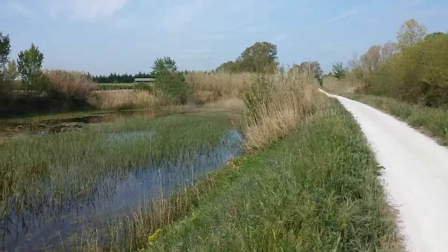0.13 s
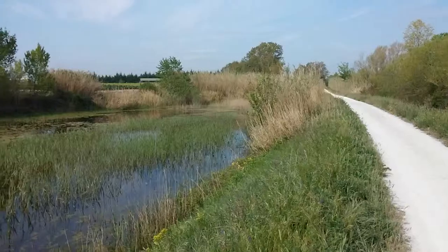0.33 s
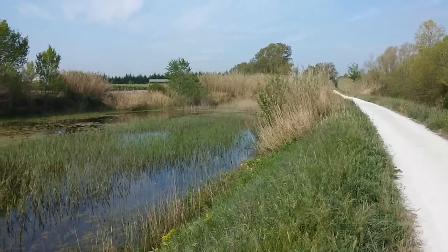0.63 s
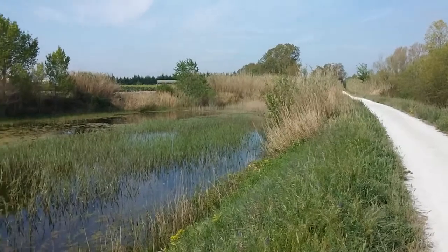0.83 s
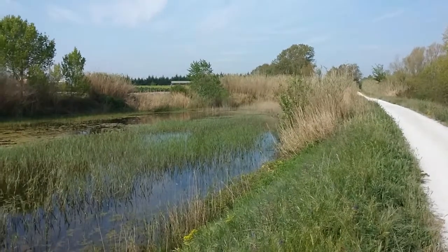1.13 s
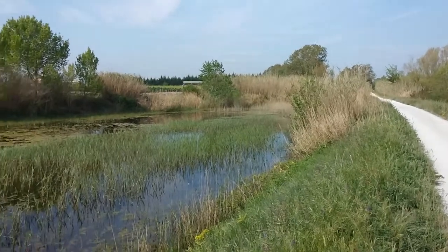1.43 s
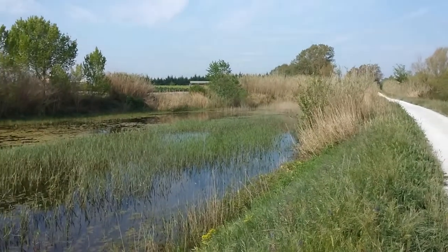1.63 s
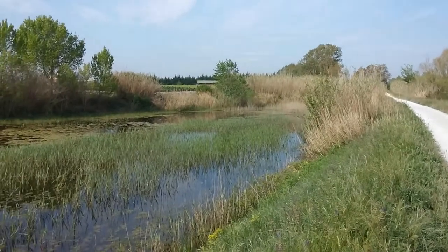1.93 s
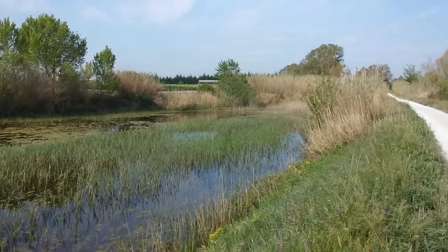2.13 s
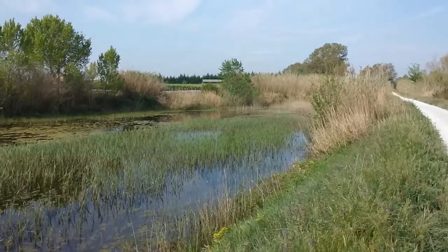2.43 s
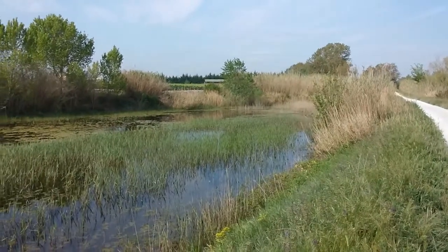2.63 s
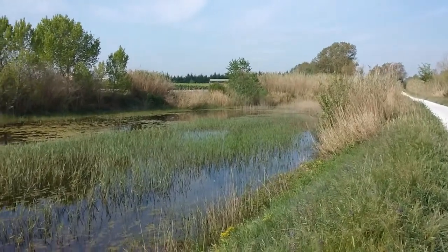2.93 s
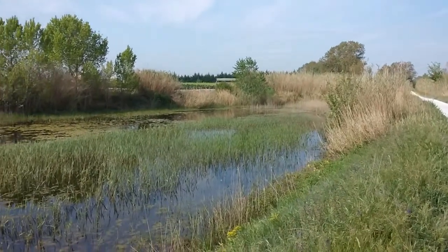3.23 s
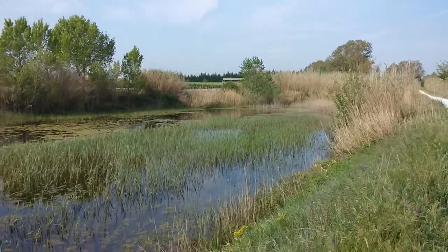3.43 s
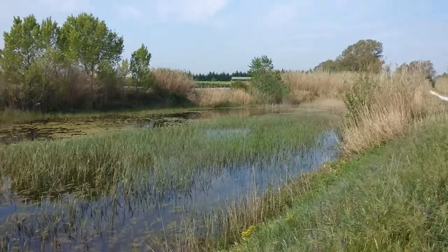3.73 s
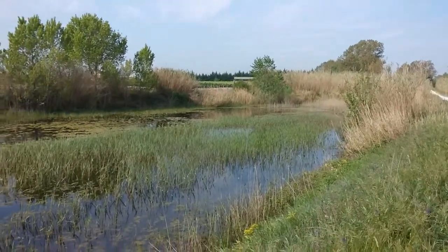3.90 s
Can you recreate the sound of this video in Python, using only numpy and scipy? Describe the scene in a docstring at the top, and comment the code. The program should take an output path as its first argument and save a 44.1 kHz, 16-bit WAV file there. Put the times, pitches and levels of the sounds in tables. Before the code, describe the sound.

Several frogs call in dry, pulsing rattles at a pond, the nearest to the right, with short rough croaks between. Gusts thud unevenly into the open microphone, strongest in the first two and a half seconds, then drop away. Faint reed rustle and airy hiss lie behind; small birds whistle and chirp on the left, clearest late.

```python
"""Gusts, reeds and overlapping frogs open a reedy pond scene: a near frog rattles and a bank frog pulses.
From about 1 s a small bird whistles sliding notes on the left, and the first run of croaks passes.
The near frog rattles again from 1.5 s; more croaks, hoots and whistles follow as the wind eases to the end.
Frogs are pulses ringing decaying sines; hoots and birds are gliding sines; wind and reeds are flickering
noise bands, with short low-pitched blows added to the wind at each microphone port."""
import sys
import numpy as np
from scipy import signal
from scipy.io import wavfile

SR = 44100
rng = np.random.default_rng(int(sys.argv[2]) if len(sys.argv) > 2 else 0)


def put_to_file(sound):
    """Save the sound as 16-bit audio at rate SR, in the file named by the first command-line argument."""
    columns = np.atleast_2d(sound).T  # one column per channel
    safe = np.clip(columns, -1, 1)
    whole_steps = np.round(safe * 32767)
    wavfile.write(sys.argv[1], SR, whole_steps.astype(np.int16))


N = 179222
TIME = np.arange(N) / SR
# The left port is ahead for the near, croaking and chattering frogs, behind for birds, bank frog and tick.
FROG_LEAD_S, LEFT_LAG_S = 0.000736, 0.00017


def from_db(db):
    """Decibels to amplitude."""
    return 10 ** (np.asarray(db) / 20)


def rms_one(x):
    """Scale each channel to an rms of 1."""
    return x / np.sqrt(np.mean(x ** 2, axis=-1, keepdims=True) + 1e-20)


def in_time(rows):
    """Columns joined in time, and a mask of the span."""
    s, *columns = np.transpose(rows)
    return [np.interp(TIME, s, c) for c in columns] + [(TIME > s[0]) & (TIME < s[-1])]


def drift(rate_hz):
    """Slow random curve of spread 1 per channel: white noise through a two-pole low-pass."""
    step = 20  # samples between points of the curve
    pole = np.exp(-2 * np.pi * step * rate_hz / SR)
    white = rng.standard_normal((2, N // step + 2002))
    smooth = signal.lfilter([1], [1, -2 * pole, pole * pole], white)
    slow = rms_one(smooth[:, 2000:])  # drop the filter's settling
    return np.array([np.interp(np.arange(N) / step, np.arange(len(v)), v) for v in slow])


def place(x, pan_db, lag_s):
    """Left-right level split; the left port hears the sound lag_s later."""
    ports = np.array([np.interp(TIME - lag_s, TIME, x), x])
    return ports * from_db([[pan_db / 2], [-pan_db / 2]])


def pond_echo(x, echo_db=-20):
    """A few dull echoes off water and bank."""
    dull = signal.lfilter([.3], [1, -.7], x)
    echoes = sum(np.interp(TIME - lag_s, TIME, dull) for lag_s in (.009, .017, .026))
    return x + from_db(echo_db) * echoes


def pings(s, db, hz, t60_s, rise_s=0.00071):
    """Each pulse is a sine that swells fast and dies away."""
    t = np.arange(900) / SR
    shape = (1 - np.exp(-(t / rise_s) ** 2)) * from_db(-60 * t / t60_s)
    sines = np.sin(2 * np.pi * np.outer(hz, t))
    waves = from_db(db)[:, None] * shape / shape.max() * sines
    first = np.clip(np.round(s * SR).astype(int), 0, N - 1)
    out = np.zeros(N + 900)
    np.add.at(out, first[:, None] + np.arange(900), waves)
    return out[:N]


def glides(notes, flutter_hz):
    """Sliding tones whose strength and phase flutter."""
    out, flutter = np.zeros(N), drift(flutter_hz)
    for s, length, start_hz, end_hz, db in notes:
        at = slice(int(s * SR), int((s + length) * SR))
        part = (TIME[at] - s) / length
        phase = 2 * np.pi * np.cumsum(start_hz + (end_hz - start_hz) * part) / SR
        voice = (1 + .5 * flutter[0, at]) * np.sin(phase) + .5 * flutter[1, at] * np.cos(phase)
        swell = np.sqrt(np.abs(np.sin(np.pi * part)))
        out[at] += from_db(db) * swell * voice
    return out


def banded_noise(spectrum, patchy_db, rate_hz):
    """Half-octave bands of noise, unrelated in both channels, flickering both together and singly."""
    hz, level_db = np.transpose(spectrum)
    out, together = 0, drift(rate_hz)
    edges = hz[0] * 2 ** np.arange(0, np.log2(hz[-1] / hz[0]) + .01, .5)
    white = rng.standard_normal((2, 2, N))  # neighbouring bands use different noise
    for k, (low, high) in enumerate(zip(edges, np.append(edges[1:], hz[-1] + 1))):
        band_filter = signal.butter(2, [low, high], "band", fs=SR, output="sos")
        band = signal.sosfilt(band_filter, white[k % 2])
        centre_db = np.interp(np.log(low * high) / 2, np.log(hz), level_db)
        flicker = from_db(patchy_db * (together + 0.98 * drift(rate_hz)))
        out = out + from_db(centre_db) * band * flicker
    return out


# Reeds and air over time: t/s, left rush level/dB, right rush level/dB, rustle level/dB
AIR_LEVELS = [(.16, -42, -51, -56), (.35, -46.5, -61, -54), (.9, -45, -51, -56), (1.5, -47, -47.5, -57),
              (1.66, -54.5, -56.5, -68.5), (1.96, -52.5, -71, -69), (2.2, -48.5, -53, -65.5),
              (2.41, -55.5, -58, -68.5), (2.6, -50.5, -55, -62.5), (2.86, -57, -60, -66),
              (3.05, -59, -57, -67), (3.31, -57, -57.5, -73.5), (3.61, -43.5, -51, -61),
              (3.9, -50, -54.5, -64), (4.06, -45, -50, -55.5)]
# Hiss over time: t/s, left level/dB
HISS_LEVELS = [(.16, -59.5), (.31, -74), (.5, -66.5), (1.1, -62), (3.3, -61), (4.06, -65.5)]
# Tone of the rush, the reed rustle and the hiss: f/Hz, relative level/dB per Hz
RUSH_SPECTRUM = [(150, -21), (250, -4), (949, 4), (1230, -14), (1570, 2), (1930, -1.5), (2800, -9.5),
                 (3640, -38), (6160, -120)]
RUSTLE_SPECTRUM = [(2200, -16), (3000, 1.5), (4500, 7.5), (5500, -2.5), (7000, 1), (9000, -32.5)]
HISS_SPECTRUM = [(2650, -34), (4500, -35), (5070, 1), (5840, -6.5), (7260, -8.5), (11800, -13), (14900, -8),
                 (15600, -28)]
RUSTLE_PAN_DB, HISS_PAN_DB = 5.5, 5  # left over right
RUMBLE_DB = -50.5


def air():
    """Mid rush of air, rustle of reeds, a high hiss and a faint distant rumble, all from banded noise."""
    left_db, right_db, rustle_db, _ = in_time(AIR_LEVELS)
    hiss_db, _ = in_time(HISS_LEVELS)
    rush = rms_one(banded_noise(RUSH_SPECTRUM, patchy_db=2.5, rate_hz=11.1))
    rush = rush * from_db([left_db, right_db])
    rustle = rms_one(banded_noise(RUSTLE_SPECTRUM, patchy_db=-0.1, rate_hz=28))
    rustle = rustle * from_db([rustle_db + RUSTLE_PAN_DB / 2, rustle_db - RUSTLE_PAN_DB / 2])
    hiss = rms_one(banded_noise(HISS_SPECTRUM, patchy_db=1.5, rate_hz=7.8))
    hiss = hiss * from_db([hiss_db, hiss_db - HISS_PAN_DB])
    rumble_spectrum = [(40, 10.5), (70, 2), (160, -17.5)]  # f/Hz, relative level/dB per Hz
    rumble = rms_one(banded_noise(rumble_spectrum, patchy_db=1.0, rate_hz=3.7)) * from_db(RUMBLE_DB)
    return rush + rustle + hiss + rumble


# Buffeting at each port, before the filters that shape it: t/s, left level/dB, right level/dB
WIND_LEVELS = [(.16, -33, -11), (.36, -25, -16), (.56, -23, -12.5), (.8, -22, -17.5), (1.0, -49, -19.5),
               (1.2, -15, -26.5), (1.36, -32, -44.5), (1.5, -24.5, -38), (1.68, -19.5, -42),
               (1.86, -34.5, -21.5), (2.0, -28.5, -18), (2.33, -31.5, -27), (2.54, -20.5, -24),
               (2.72, -37.5, -51), (2.88, -36.5, -35.5), (3.0, -45.5, -53), (3.12, -28, -49),
               (3.25, -37.5, -62), (3.3, -32.5, -45), (3.62, -46.5, -78), (4.06, -52, -72)]
# Tone of the buffeting: f/Hz, relative level/dB per Hz
BUFFET_SPECTRUM = [(15, -66), (25, -40), (59, 11), (109, 5.5), (248, -3.5), (706, -61), (1500, -48.5),
                   (1950, -63), (3300, -120)]
# Single blows of wind, before the bass cut: t/s, body level/dB, f/Hz, port (1 right, anything below left)
WIND_BLOWS = [(0.162, -14.5, 103, 1), (0.176, -16, 105, 0), (0.259, -21, 93, 0), (0.345, -6.5, 126, 0),
              (0.358, -10.0, 92, 0), (0.377, -7.5, 146, 1), (0.547, -11.5, 124, 0), (0.569, -5.5, 248, 1),
              (0.616, -8, 93, 0), (0.621, -6, 162, 1), (0.649, -8, 144, 1), (0.72, -16, 108, 1),
              (0.812, -10, 179, 1), (0.845, -8.5, 145, 1), (0.849, -4, 126, 0), (0.872, -14.5, 145, 0),
              (0.934, -10.5, 115, 1), (1.117, -17, 158, 1), (1.225, -4, 172, 0), (1.402, -17.5, 109, 0),
              (1.447, -6.5, 99, 0), (1.5, -10, 147, 0), (1.523, -13, 87, 0), (1.635, -9, 83.5, 0),
              (1.691, -3, 97, 0), (1.698, -16, 116, 1), (1.802, -16, 129, 1), (1.799, -20, 261, 1),
              (1.824, -5, 114, 0), (1.845, -12.5, 250, 0.91), (1.858, -3, 98, 0), (1.934, -20, 96, 0),
              (1.959, -12, 178, 1), (1.972, -15, 119, 0), (2.019, -17, 120, 0), (2.089, -0.5, 128.5, 0),
              (2.138, -22, 278, 1), (2.22, -11, 158, 1), (2.233, -5.5, 118, 0), (2.36, -20.5, 124, 1),
              (2.38, -15, 87, 0), (2.48, -13.5, 131, 1), (2.496, -5.5, 139, 0), (2.551, -17, 232, 0.97),
              (2.689, -20.5, 280, 0.96), (2.69, -8.5, 93, 0), (2.873, -19.5, 79.4, 0),
              (2.899, -21.5, 147, 1), (3.068, -30, 130, 1), (3.069, -27.5, 131, 0), (3.109, -23, 67.5, 0),
              (3.176, -14.5, 136, 0), (3.313, -27, 98, 0), (3.345, -37, 100, 0), (3.384, -27, 210, 0)]


def wind():
    """Lumpy low noise in each port, with single blows of a cycle or two and a sharper edge on top."""
    left_db, right_db, _ = in_time(WIND_LEVELS)
    out = rms_one(banded_noise(BUFFET_SPECTRUM, patchy_db=4.5, rate_hz=13.94))
    out = out * from_db([left_db, right_db])
    # finer eddies at the right port, slower ones at the left
    out[1] += 0.52 * signal.sosfilt(signal.butter(2, 220, "high", fs=SR, output="sos"), out[1])
    out[0] += 0.73 * signal.sosfilt(signal.butter(2, 90, fs=SR, output="sos"), out[0])
    out[1] = signal.sosfilt(signal.butter(2, 70, "high", fs=SR, output="sos"), out[1])
    for s, db, hz, port in WIND_BLOWS:
        first = max(int((s - .05) * SR), 0)
        cycles = (TIME[first:int((s + .05) * SR)] - s) * hz
        body = np.exp(-(cycles / 0.65) ** 2) * np.cos(2 * np.pi * (cycles + rng.random()))
        edge = np.exp(-(cycles / 0.32) ** 2) * np.cos(2 * np.pi * (1.93 * cycles + rng.random()))
        out[int(port), first:first + len(cycles)] += from_db(db) * (body + 0.27 * edge)
    # the capsules drop deep bass
    return signal.sosfilt(signal.butter(4, 54, "high", fs=SR, output="sos"), out)


def tick():
    """One very short bright snap on the left: a 9.5 kHz sine that dies almost at once."""
    snap = pings(np.array([1.497]), np.array([-41]), [9500], t60_s=.0012, rise_s=.00004)
    return place(snap, 14, LEFT_LAG_S)


WARBLE_DB = 2.4  # unsteadiness of the whistled notes
UPPER_SWING = 0.16  # share of the swell and fade that reaches the upper partials


def whistle(notes, multiples, rise_db, fall_db):
    """Near sines that slide from start to end pitch, swell to a peak and fade, a little unsteady."""
    out = np.zeros(N)
    for s, length, peak, start_hz, end_hz, bend, *levels_db in notes:
        at = slice(int(s * SR), int((s + length) * SR))
        t = TIME[at] - s
        slide = np.expm1(-bend * t / length) / np.expm1(-bend + 1e-9)
        turns = np.cumsum(start_hz + (end_hz - start_hz) * slide) / SR
        swing_db = np.interp(t, [0, peak, length], [-rise_db, 0, -fall_db])
        for k, db in zip(multiples, levels_db):
            share = 1 if k == 1 else UPPER_SWING
            out[at] += from_db(db + swing_db * share) * np.sin(2 * np.pi * k * turns)
    return pond_echo(out * from_db(WARBLE_DB * drift(90)[0]), echo_db=-13.5)


# Song in three partials: t/s, length/s, peak after/s, start f/Hz, end f/Hz, bend (+ slides early, - late),
# level/dB, level/dB at 1.5 times the pitch, level/dB at twice the pitch
SONG_NOTES = [(1.085, 0.052, 0.015, 3100, 2960, 1.8, -56, -60, -77),
              (1.255, 0.089, .025, 3300, 2890, 0.95, -55, -60.5, -77),
              (1.435, 0.072, 0.025, 3471, 3050, 1.6, -48.5, -56, -60),
              (1.62, 0.072, .022, 3500, 3090, 1.4, -51.5, -65, -82),
              (1.79, 0.078, 0.037, 3750, 3070, 1.5, -50, -77, -77),
              (1.978, .075, 0.031, 3690, 3120, 1.55, -46.5, -80, -70),
              (2.16, 0.088, 0.036, 3740, 3185, 2, -46.5, -72, -80),
              (2.34, 0.084, 0.043, 3740, 3284, 3.15, -44, -60, -71),
              (2.53, .075, .034, 3780, 3240, 2.1, -45, -64, -72),
              (2.72, 0.076, 0.023, 3820, 3240, 2.3, -46.5, -59, -70),
              (2.905, 0.087, 0.033, 3880, 3220, 2.2, -48, -59.5, -63.5)]
# Other birds' whistles: t/s, length/s, peak after/s, start f/Hz, end f/Hz, bend (as above), level/dB
WHISTLE_NOTES = [(2.15, 0.045, 0.039, 3150, 3010, 0.5, -48), (3.01, 0.023, .006, 2900, 3000, -.9, -54),
                 (3.035, 0.065, .012, 3240, 3370, 1.5, -51.5), (3.415, 0.019, 0.024, 4140, 4720, 2, -41),
                 (3.435, 0.019, 0.0044, 3910, 3270, 1.5, -45), (3.505, 0.064, 0.012, 3480, 2980, -3, -47.5),
                 (3.515, 0.08, 0.05, 2370, 2580, 1.5, -44.5), (3.68, 0.053, 0.033, 3680, 3070, -3.5, -43.5),
                 (3.732, 0.064, 0.034, 4000, 3940, 0, -41), (3.815, 0.069, .03, 3100, 3490, 2.2, -47.5),
                 (3.88, 0.043, 0.027, 3710, 2980, -3, -39.5)]
# Hoarse chirps: t/s, length/s, start f/Hz, end f/Hz, level/dB
CHIRP_NOTES = [(0.792, 0.052, 5840, 6170, -57.5), (.89, .12, 4640, 4720, -61),
               (1.116, 0.067, 4770, 4180, -57), (1.24, 0.062, 5300, 6160, -62),
               (1.298, .03, 6000, 6100, -57), (1.303, 0.048, 5300, 5580, -54),
               (1.338, 0.045, 5400, 4670, -58), (1.447, 0.019, 7900, 7900, -61.5),
               (1.62, 0.016, 4800, 4400, -61), (1.63, 0.034, 5870, 5700, -61.5),
               (1.99, 0.0097, 7000, 7100, -57.5), (2.059, 0.044, 4820, 4400, -64),
               (2.1, 0.032, 4870, 4890, -57), (2.59, 0.072, 5550, 4840, -52),
               (3.006, 0.011, 5700, 5600, -59), (3.027, 0.018, 5690, 5640, -54.5),
               (3.042, 0.014, 5880, 5400, -49), (3.063, 0.012, 5420, 4750, -48),
               (3.24, 0.074, 4440, 5760, -66), (3.665, 0.043, 5580, 5400, -60),
               (3.705, 0.036, 5400, 4170, -56)]


def birds():
    """Sliding whistles and hoarse fluttering chirps, all to the left."""
    song = whistle(SONG_NOTES, multiples=(1, 3 / 2, 2), rise_db=21, fall_db=20)
    others = whistle(WHISTLE_NOTES, multiples=(1,), rise_db=17.5, fall_db=20.5)
    chirps = pond_echo(glides(CHIRP_NOTES, flutter_hz=170), echo_db=-10)
    return place(song, 17, LEFT_LAG_S) + place(others, 9.0, LEFT_LAG_S) + place(chirps, 18, LEFT_LAG_S)


# Frog on the left bank, one row a group: t/s of the middle pulse, level/dB
BANK_GROUPS = [(0.187, -40.5), (0.23, -40.5), (0.267, -39.5), (0.311, -39), (0.351, -40.5), (0.385, -44.5),
               (0.427, -39), (0.473, -40.5), (0.515, -41.5), (0.557, -42), (0.597, -42.5), (0.635, -42),
               (0.679, -37.5), (0.721, -41), (0.761, -40), (0.802, -38.5), (0.85, -41), (0.899, -41.5),
               (0.935, -41.5), (0.981, -48), (1.012, -56), (1.048, -53)]
# Its resonances: f/Hz, 60 dB decay/s, relative level/dB, left over right/dB
BANK_RESONANCES = [(2760, 0.012, -2, -1.5), (3380, 0.0017, -2.5, 24), (4190, 0.013, -8, 15.5)]


def bank_frog(gap_s=.0078):
    """Three uneven pulses a group, the middle one strongest on average, ring three resonances."""
    s, db = np.transpose(BANK_GROUPS)
    chance = rng.normal(0, 1, (len(s), 3, 3))
    times = (s[:, None] + gap_s * np.arange(-1, 2) + 0.001 * chance[..., 0]).ravel()
    levels = (db[:, None] + np.array([-3.0, 0, -2.5]) + 2.0 * chance[..., 1]).ravel()
    detune = 1 + .01 * chance[..., 2].ravel()
    out = 0
    for hz, t60_s, mode_db, pan_db in BANK_RESONANCES:
        ring = pings(times, levels + mode_db, hz * detune, t60_s, rise_s=0.0004)
        out = out + place(ring, pan_db, LEFT_LAG_S)
    return out


# Several frogs overlapping, one list a run: t/s, level/dB, sac f/Hz
CHATTER_RUNS = [
    [(.158, -41, 2070), (.19, -44.5, 2130), (.24, -46, 2140), (.27, -55, 2050), (.48, -60, 1900),
     (.64, -52, 1780)],
    [(0.86, -55, 2030), (0.924, -47, 2280), (1.0, -44, 2090)],
    [(2.12, -43.5, 1930), (2.268, -40, 1814), (2.476, -42, 1950), (2.57, -44.5, 1910)],
    [(2.65, -39.5, 1970), (2.802, -46, 1900), (2.858, -48, 1990), (2.996, -44, 1935), (3.088, -67, 1920),
     (3.2, -62, 1740)],
]


def chatter(per_s=190, spread_db=2.0):
    """Pulses of several frogs fall at uneven gaps, each with its own strength and sac pitch."""
    out = 0
    for rows in CHATTER_RUNS:
        db, hz, _ = in_time(rows)
        chance = rng.normal(0, 1, (300, 3))
        times = rows[0][0] + np.cumsum(np.exp(.22 * chance[:, 0])) / per_s
        at = (times[times < rows[-1][0]] * SR).astype(int)
        chance = chance[:len(at)]
        levels = db[at] + spread_db * chance[:, 1]
        pitches = hz[at] + 110 * chance[:, 2]
        out = out + pings(at / SR, levels, pitches, t60_s=.013, rise_s=0.0014)
    return place(pond_echo(out), -12.0, -FROG_LEAD_S)


# Croaks, one list a run: t/s, level/dB, sac f/Hz, pulse rate f/Hz
CROAK_RUNS = [
    [(1.01, -50, 2000, 185), (1.055, -42.5, 1830, 195), (1.09, -48, 1760, 205), (1.108, -51, 1800, 215),
     (1.135, -41.5, 1770, 224), (1.168, -36, 1760, 370), (1.2, -48, 1800, 116)],
    [(2.545, -56, 1420, 230), (2.585, -38, 1690, 290), (2.627, -30.5, 1830, 310), (2.653, -36.5, 1950, 340),
     (2.672, -58, 2070, 290)],
    [(3.51, -48, 2010, 283), (3.544, -41.5, 1750, 220), (3.584, -39.5, 1440, 232), (3.636, -33, 1620, 265),
     (3.67, -41.5, 1730, 330), (3.69, -55, 1800, 280)],
]
# Soft hoots, two between the croak runs and three lower ones under the last run:
# t/s, length/s, start f/Hz, end f/Hz, level/dB
HOOT_NOTES = [(1.77, 0.037, 1430, 1400, -52), (1.97, .03, 1430, 1400, -50), (3.553, 0.047, 443, 473, -46),
              (3.602, 0.025, 497, 480, -45.5), (3.642, 0.027, 517, 430, -44.5)]


def croaks():
    """Hoots, and uneven pulses ringing a sac of sliding pitch, with a lower throat mode and a rasp above."""
    out = glides(HOOT_NOTES, flutter_hz=30)
    for rows in CROAK_RUNS:
        db, hz, per_s, on = in_time(rows)
        pulse_count = np.floor(np.cumsum(per_s * on) / SR)
        at = np.flatnonzero(np.diff(pulse_count))
        wobble = rng.normal(0, 1, (len(at), 3))
        times = at / SR + .00013 * wobble[:, 0]
        levels = db[at] + 2.2 * wobble[:, 1]
        sac = pings(times, levels + 6, hz[at] + 70 * wobble[:, 2], t60_s=.012, rise_s=.0007)
        throat = pings(times, levels - 5, .8 * hz[at], t60_s=.012, rise_s=.0008)
        rasp = pings(times, levels - 8.5, 1.46 * hz[at], t60_s=0.0067, rise_s=0.001)
        out += sac + throat + rasp
    return place(pond_echo(out), -4.5, -FROG_LEAD_S)


# Near frog, one row a group: t/s of the main pulse, relative level/dB, gap to the closing pulse/ms,
# second lead-in level/dB against the main pulse
RATTLE_GROUPS = [(.2054, -24.5, 14.7, -5), (.2596, -25, 11, -5), (0.3144, -25, 13, -2),
                 (0.369, -25, 10.7, -1.5), (0.426, -25.5, 6, -7), (.4859, -30, 6.8, 0.5),
                 (0.5444, -30, 6.6, -22), (.6021, -30, 5.6, 0.5), (1.476, -35.5, 9.8, -12),
                 (1.526, -34, 5.9, -10), (1.5873, -30, 13, -5), (1.6369, -30.5, 7.6, -9),
                 (1.6898, -28.5, 9.8, -8), (1.7462, -29.5, 8.8, -9), (1.8036, -25.5, 12.5, -8),
                 (1.8616, -25, 10.7, -5), (1.9099, -25, 8.5, -12), (1.9662, -24.5, 8.5, -9),
                 (2.0264, -23, 10.3, -2), (2.0858, -23, 10.4, -1), (2.149, -25, 10.1, -2),
                 (2.2045, -26, 6.3, 1.5), (2.8573, -29, 8.2, -14), (2.9277, -31.5, 4.4, -11),
                 (2.9628, -25, 6, -17), (3.224, -39, 14.7, -8), (3.2768, -39.5, 11, -1),
                 (3.3288, -35.5, 9.8, -13), (3.385, -29, 13.4, -9), (3.4358, -27, 9.2, -15),
                 (3.4876, -28.5, 8.7, -6), (3.5458, -24, 10.3, -5), (3.5998, -24.5, 9.3, -8),
                 (3.659, -23.5, 13, 1), (3.709, -23, 9.7, -21), (3.7669, -25, 8.4, -19),
                 (3.8206, -26, 9, -6), (3.8856, -25.5, 17, -1), (3.9402, -21, 9.7, -8),
                 (3.9939, -24, 8.6, -2), (4.0476, -21.5, 8.2, -9)]
# The sac rises in pitch as a rattle swells and sags as it ends: t/s, f/Hz
SAC_PITCH = [(.2, 2080), (.34, 2164), (.48, 1880), (.6, 1860), (1.48, 1880), (1.93, 2177), (2.03, 2176),
             (2.2, 1904), (2.95, 1936), (3.22, 1860), (3.49, 2235), (3.85, 2320), (4.05, 2225)]
LEAD_GAP_S = .0063
FIRST_DB, CLOSING_DB = -6.5, 1.5  # first lead-in against the second, closing pulse against the main one
OVERTONE_HZ, OVERTONE_DB = 5095, -31.5  # pitch when the sac is at 2200 Hz; level against the table


def near_frog():
    """Two rising lead-in pulses, the main pulse and a closing one; the overtone carries to the left."""
    s, db, close_ms, lead_db = np.transpose(RATTLE_GROUPS)
    hz = np.tile(np.interp(s, *np.transpose(SAC_PITCH)), 4)
    times = np.concatenate([s - 2.1 * LEAD_GAP_S, s - LEAD_GAP_S, s, s + close_ms / 1000])
    levels = np.concatenate([db + lead_db + FIRST_DB, db + lead_db, db, db + CLOSING_DB])
    # the slow-rising sac starts a little early
    sac = pond_echo(pings(times - .0004, levels - 7.5, hz, t60_s=0.011, rise_s=0.0013))
    overtone_hz = OVERTONE_HZ + .5 * (hz - 2200)
    overtone = pings(times, levels + OVERTONE_DB, overtone_hz, t60_s=0.013)
    return place(sac, -10.5, -FROG_LEAD_S) + place(overtone, 19.7, -FROG_LEAD_S)


def scene():
    """All layers summed, from the air behind to the frog close by."""
    return air() + wind() + tick() + birds() + bank_frog() + chatter() + croaks() + near_frog()


# Brief dips in level: t/s, depth level/dB, half width/s (where 1/e of the depth is left)
LEVEL_DIPS = [(2.834, -13, 0.021), (3.263, -11.5, 0.022), (3.81, -17.5, 0.0096), (3.978, -11.5, 0.0092),
              (4.037, -15.5, 0.016)]
START_S, CUTOFF_HZ = .1575, 16300  # silence before the sound opens; full treble cut from here up


def record(dry):
    """The ports have opposite polarity; the sound opens after a short silence and dips; the top is cut."""
    dips_db = sum(db * np.exp(-((TIME - s) / half) ** 2) for s, db, half in LEVEL_DIPS)
    fade_in = np.clip((TIME - START_S) / 0.00085, 0, 1)
    opened = dry * [[-1], [1]] * from_db(dips_db) * fade_in
    return signal.sosfilt(signal.cheby2(14, 70, CUTOFF_HZ, fs=SR, output="sos"), opened)


dry = scene()
out = record(dry)
put_to_file(out)
```